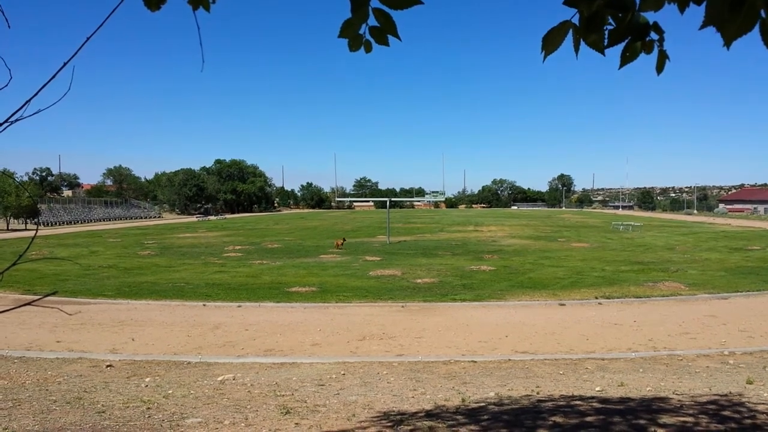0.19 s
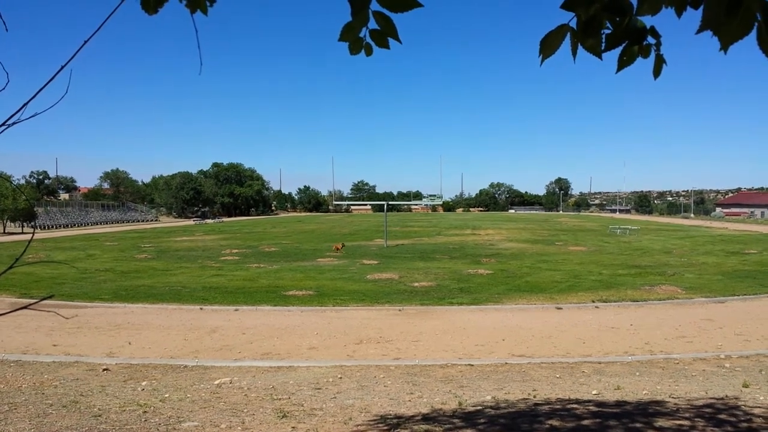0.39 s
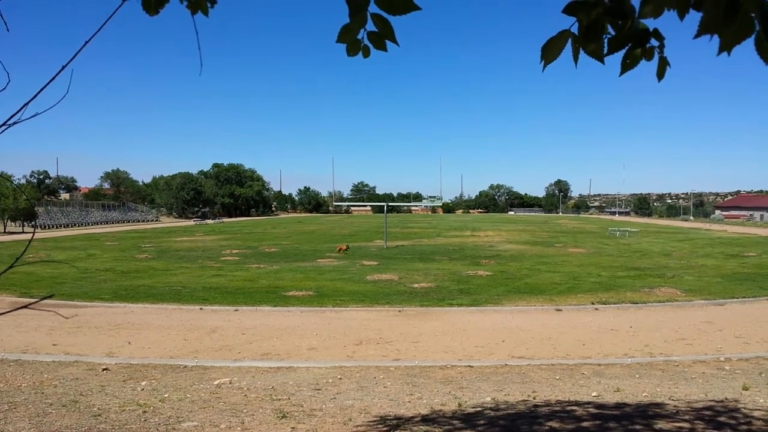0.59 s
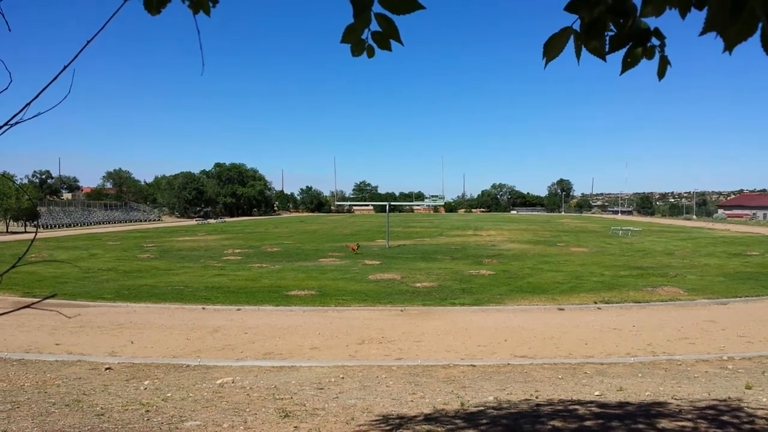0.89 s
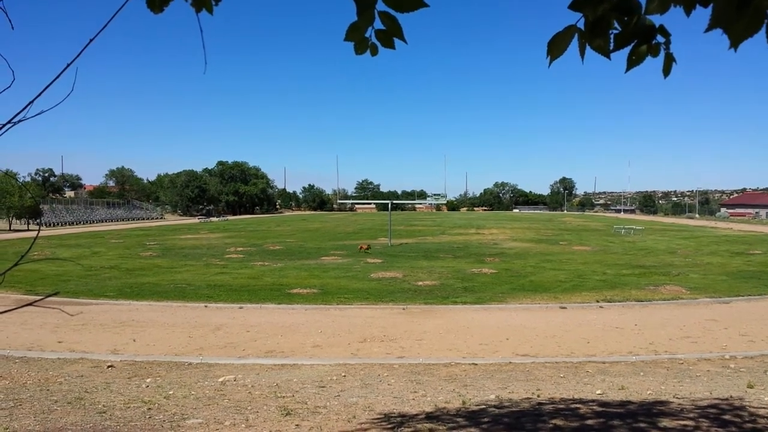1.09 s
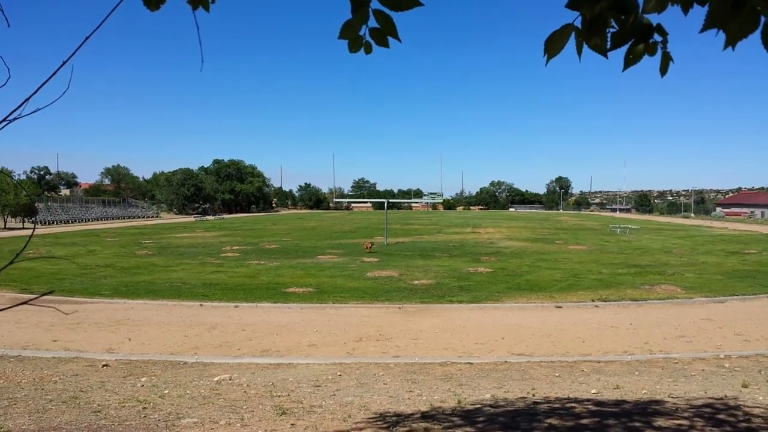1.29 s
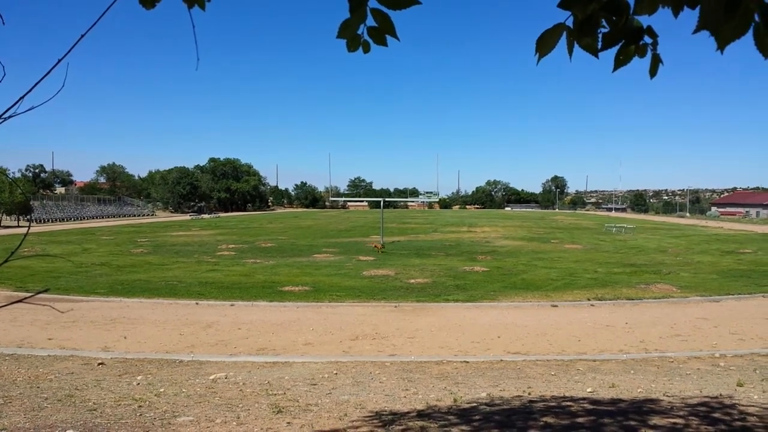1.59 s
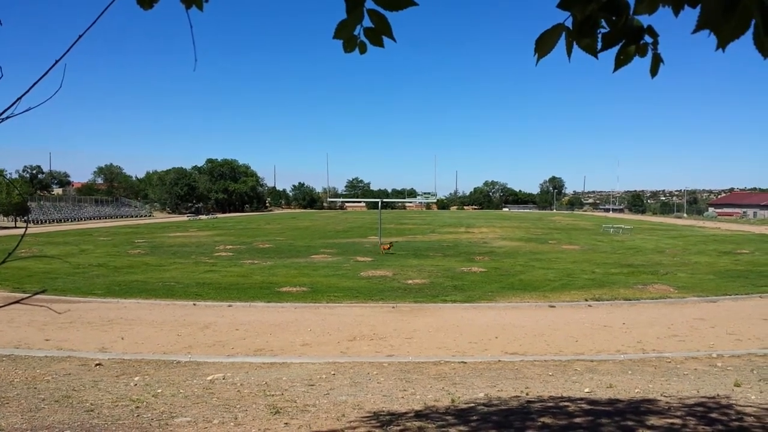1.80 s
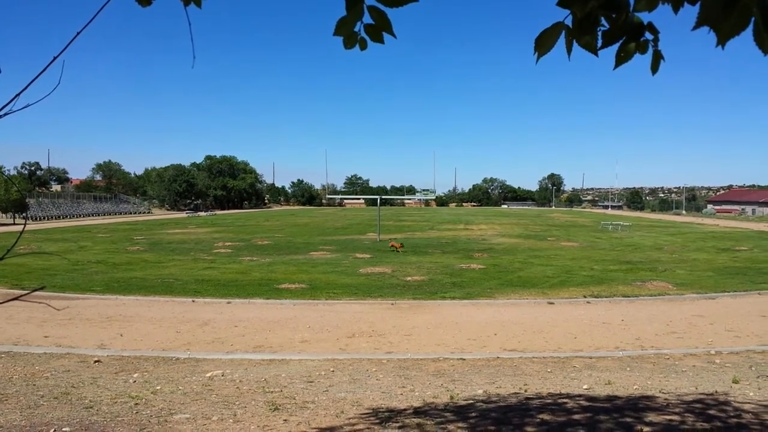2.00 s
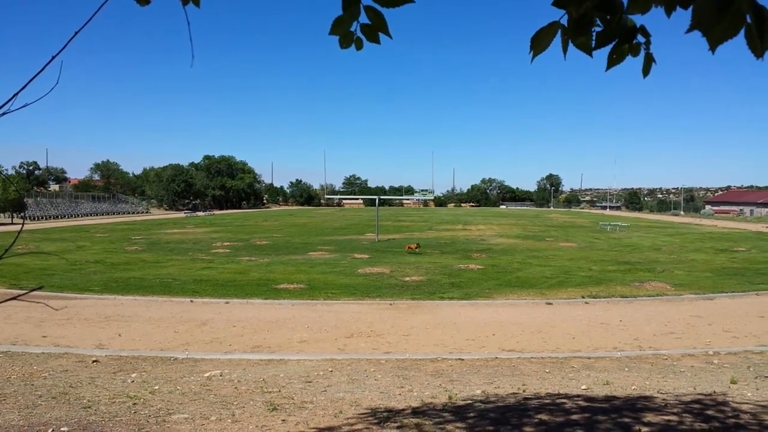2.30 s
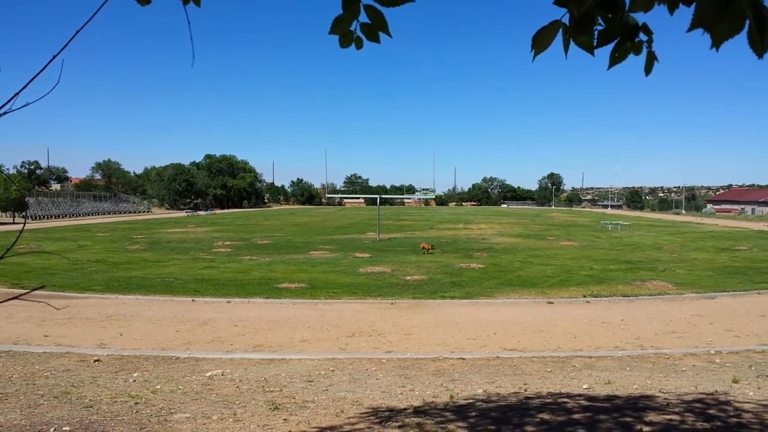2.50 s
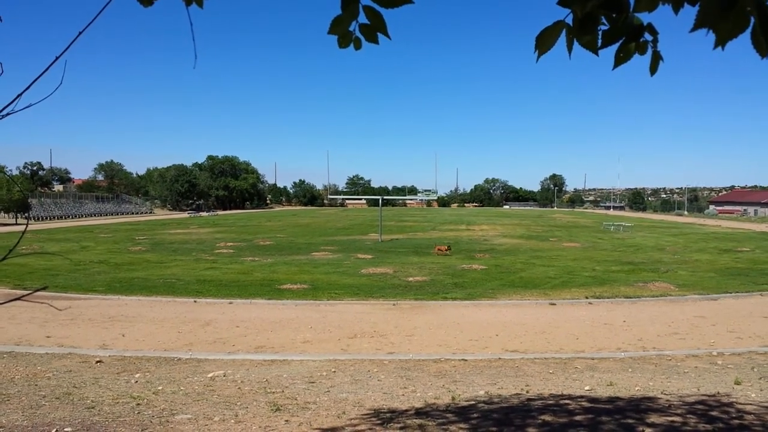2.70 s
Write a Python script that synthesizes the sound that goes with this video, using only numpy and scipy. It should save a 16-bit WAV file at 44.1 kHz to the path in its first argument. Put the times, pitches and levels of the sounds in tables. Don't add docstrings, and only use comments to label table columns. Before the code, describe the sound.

A burrowing animal barks faintly, then once loudly over a swelling distant engine; a hoarse bird caws and another answers. Fingers tick and snap the casing of a handheld microphone on an open field.

```python
import sys
import numpy as np
from scipy import signal
from scipy.io import wavfile
from scipy.ndimage import uniform_filter1d

SR = 44100
rng = np.random.default_rng(int(sys.argv[2]) if len(sys.argv) > 2 else 0)


def to_wav(s):
    ch = np.atleast_2d(s).T
    pcm = np.round(np.clip(ch, -1, 1) * 32767)
    wavfile.write(sys.argv[1], SR, pcm.astype(np.int16))


def magnitude_from_level(level_db):
    exponent = np.asarray(level_db, float) / 20
    return 10 ** exponent


N = 125685
EDGE_HZ = 14600


def evened(x):
    return x / np.sqrt(np.mean(x ** 2) + 1e-20)


def read(points, hz):
    f, value = np.transpose(points)
    return np.interp(np.log(hz + 1), np.log(f + 1), value)


def curve(table, t):
    cols = np.transpose(table)
    return [np.interp(t, cols[0], c) for c in cols[1:]]


def add(mix, start_s, sound, pan_db):
    part = mix[:, round(start_s * SR):][:, :sound.shape[-1]]
    placed = sound * magnitude_from_level(np.array([[min(pan_db, 0)], [min(-pan_db, 0)]]))
    part += placed[:, :part.shape[1]]


def resonate(x, hz, width):
    turn = np.exp(2j * np.pi * np.cumsum(hz * np.ones(len(x))) / SR)
    r = np.exp(-np.pi * width / SR)
    return 2 * (turn * signal.lfilter([1 - r], [1, -r], x / turn + 1e-18)).real


def drift(length, span_s):
    span = max(round(span_s * SR), 1)
    return evened(uniform_filter1d(uniform_filter1d(rng.standard_normal(length), span), span))


def air():
    # start_s [s], level_db [dB]
    gain_ride = [(0, -65.5), (.2, -69), (.48, -73), (.56, -79.5), (1.12, -77), (1.45, -67), (1.8, -63.5),
                 (2.5, -64), (2.65, -65.5), (2.85, -66.5)]
    # freq_hz [Hz], density_db [dB per Hz]
    air_colour = [(40, -8), (110, 0), (400, -17), (1050, -19), (1600, -28.5), (5500, -36.5), (8000, -36.5),
                  (9500, -38.5), (14600, -40.5)]
    # freq_hz [Hz], likeness [-1 to 1]
    port_likeness = [(60, 0.77), (180, 0.9), (550, 0.71), (1650, 0.0), (4970, 0), (15000, 0.13)]
    # freq_hz [Hz], left_minus_right_db [dB]
    port_lean = [(60, -3.5), (240, 4.5), (950, -0.5), (3770, 2), (15000, -5)]
    air_db, patchy_db, flicker_db = 19.5, 2, 0.1
    whine_hz, whine_width_hz, whine_db = 7950, 350, 3.5

    frames, hz = N // 256 + 5, np.fft.rfftfreq(1024, 1 / SR)
    a, b, c, d, patches = rng.standard_normal((frames, 513, 5)).T
    patches = evened(uniform_filter1d(uniform_filter1d(patches, 12, 0), 8, 1))
    flicker = evened(uniform_filter1d(rng.standard_normal(frames), 2))
    same = np.clip(read(port_likeness, hz), -1, 1)[:, None]
    left = a + 1j * b
    right = same * left + np.sqrt(1 - same ** 2) * (c + 1j * d)
    z = np.array([left, right])
    whine = whine_db * np.exp(-((hz[:, None] - whine_hz) / whine_width_hz) ** 2)
    lean = read(port_lean, hz)[:, None] * np.array([.5, -.5])[:, None, None]
    colour_db = read(air_colour, hz)[:, None] + whine + lean
    z *= magnitude_from_level(colour_db + patchy_db * patches + flicker_db * flicker) * (hz < EDGE_HZ)[:, None]
    x = evened(signal.istft(z, nperseg=1024, noverlap=768)[1][:, :N])
    return x * magnitude_from_level(air_db + curve(gain_ride, np.arange(N) / SR)[0])


def engine():
    # start_s [s], fifth_order_hz [Hz], fifth_order_db [dB], bark_db of the other orders [dB]
    engine_ride = [
        (0, 78.5, -68, 7),
        (.56, 78.6, -58, -15),
        (1.15, 80.8, -56.5, -4),
        (1.45, 83.1, -42.5, -4),
        (1.62, 83.8, -41, -3),
        (1.85, 86.5, -38.5, -5.5),
        (2.08, 88.2, -35.5, -6.5),
        (2.3, 89.6, -34.5, -12),
        (2.52, 89.5, -45, -7),
        (2.85, 89.5, -55, -21),
    ]
    # multiple of the cycle rate, level_db [dB]
    engine_orders = [(3, -23), (4, -3.5), (6, -20), (7, -1), (8, -11), (9, -1), (10, -1), (11, -16.5),
                     (12, -2.5), (13, -22.5), (14, -17), (15, -24.5), (16, -17), (17, -17), (18, -14),
                     (20, -18)]
    waver_db, waver_rad = 2.2, .3

    hz, db, bark_db = curve(engine_ride, np.arange(N) / SR)
    cycle = 2 * np.pi * np.cumsum(hz / 5) / SR
    x = np.sqrt(2) * np.cos(5 * cycle)
    for k, level_db in engine_orders:
        level = magnitude_from_level(level_db + bark_db + waver_db * drift(N, .06))
        x = x + level * np.cos(round(k) * cycle + waver_rad * drift(N, .05))
    return magnitude_from_level(db) * x


def chirp(length_s, db, from_hz, to_hz):
    u = np.arange(0, length_s, 1 / SR) / length_s
    hz = from_hz + (to_hz - from_hz) * u
    level = magnitude_from_level(db - 3 + 4 * drift(len(u), .0015)) * np.sqrt(2 * np.sin(np.pi * u))
    return level * np.sin(2 * np.pi * np.cumsum(hz) / SR)


def small_birds(mix):
    # start_s [s], length_s [s], level_db [dB], from_hz [Hz], to_hz [Hz]
    chirp_events = [(.02, .1, -65, 2750, 2250), (.112, .02, -62, 3600, 3100), (.27, .016, -70, 4550, 4500),
                    (.30, .04, -66, 4500, 4500), (.678, .012, -73, 2650, 2550),
                    (.98, .035, -73, 4800, 4200), (.992, .022, -72, 4300, 3650),
                    (1.015, .016, -75, 3900, 4700), (1.025, .035, -74, 4250, 4150),
                    (1.028, .028, -74, 4850, 4800), (1.78, .01, -60, 7300, 7000),
                    (2.49, .01, -65, 7200, 7100), (2.606, .012, -62, 7200, 7200),
                    (2.79, .05, -65, 4600, 4400)]
    for start_s, *row in chirp_events:
        add(mix, start_s, chirp(*row), 0)


def rub(length_s, db, hz):
    u = np.arange(0, length_s, 1 / SR) / length_s
    grit = rng.standard_normal(len(u)) * magnitude_from_level(3.5 * drift(len(u), .001))
    band = signal.butter(3, [.5 * hz, 1.55 * hz], "band", fs=SR, output="sos")
    body = signal.sosfilt(band, grit)
    return magnitude_from_level(db) * evened(body) * np.sin(np.pi * u) ** .35


def finger_rubs(mix):
    # start_s [s], length_s [s], level_db [dB], centre_hz [Hz]
    rub_events = [
        (.138, .02, -43, 900),
        (.15, .048, -46, 1300),
        (.139, .06, -50, 3000),
        (.162, .04, -48, 3900),
        (.34, .21, -62, 2600),
        (2.42, .09, -54, 850),
    ]
    for start_s, *row in rub_events:
        add(mix, start_s, rub(*row), 15)


def tick(db, hz, turns, edge_db):
    u = np.arange(200) / SR * hz
    swell = (u / turns * np.exp(1 - u / turns)) ** 2
    edge = np.sin(2 * np.pi * 1.8 * u) - .35 * np.sin(2 * np.pi * 2.6 * u)
    return magnitude_from_level(db) * swell * (np.sin(2 * np.pi * u) + magnitude_from_level(edge_db) * edge)


def case_ticks(mix):
    # start_s [s], peak_db [dB], pitch_hz [Hz], left_minus_right_db [dB]
    dull_ticks = [(.179, -36.5, 1480, 35), (0.2217, -32, 1020, 32), (0.368, -48.5, 1220, 27),
                  (0.404, -38, 950, 29), (.418, -58, 2500, 20), (0.4746, -42, 3450, 27),
                  (0.479, -40, 2900, 25), (0.59, -55.5, 1000, 22), (.601, -55, 1800, 25),
                  (0.774, -44.5, 873, 28), (.814, -59, 1600, 27), (1.185, -40.5, 1158, 38.5),
                  (1.2824, -40.5, 1430, 27), (1.284, -44.5, 430, 13), (1.33, -55, 1580, 20),
                  (1.454, -41.5, 850, 36), (1.731, -36.5, 625, 26), (1.7511, -30.5, 1560, 43),
                  (1.838, -39, 630, 29), (1.947, -39.5, 450, 33), (2.474, -52, 1570, 20),
                  (2.496, -41, 2160, 35)]
    # start_s [s], peak_db [dB], pitch_hz [Hz], overtone_db [dB], left_minus_right_db [dB]
    bright_ticks = [
        (.2476, -34, 4400, -2, -9),
        (.3128, -36, 5100, -9, 14),
        (1.7503, -14.5, 4400, 3.5, -22),
    ]
    for start_s, db, hz, pan_db in dull_ticks:
        add(mix, start_s + .001, tick(db + 8, hz, turns=.65, edge_db=-12), pan_db)
    for start_s, db, hz, edge_db, pan_db in bright_ticks:
        add(mix, start_s, tick(db, hz, 1.15, edge_db), pan_db)


def snap(db, right_db, modes):
    t, pair = np.arange(600) / SR, np.zeros((2, 600))
    right_slower = np.array([[1], [1.5]])
    port_phase = np.array([[0], [np.pi / 2]])
    for k, (hz, left_mode_db, right_mode_db, swell_ms) in enumerate(modes):
        u = t / (swell_ms / 1000 * right_slower)
        level = magnitude_from_level(np.array([[left_mode_db], [right_mode_db]])) * (-1) ** k
        pair += level * u * np.exp(1 - u) * np.sin(2 * np.pi * hz * t + port_phase)
    return magnitude_from_level(db + np.array([[0], [right_db]])) * pair / abs(pair).max(1, keepdims=True)


def case_snaps(mix):
    # start_s [s], peak_db [dB], right_port_db [dB]
    snap_events = [
        (.2084, .8, -9.5),
        (2.5977, -3, -6),
    ]
    # freq_hz [Hz], left_db [dB], right_db [dB], swell_ms [ms]
    seam_modes = [
        [(186, -14, -41.5, .8), (850, -1, -16.5, 0.67), (1430, -28.5, -15, 0.72), (2230, -0.5, -11.5, 0.44),
         (3250, 2, -8.5, 0.21), (4700, -18.5, -8, .3), (5910, 2, -6, 0.17), (7560, -11, -2.5, 0.13),
         (9700, -7, -2.5, 0.11), (13940, -17, -15, .12)],
        [(607, -2, -19, 0.7), (2050, 2, -17, 0.49), (3120, 3, 0, 0.3), (5580, 0, -6, 0.19),
         (7010, -27, -5.5, 0.18), (8710, -31, -0.5, 0.14), (10460, -32, -5, 0.13), (13200, -32, -14.5, 0.18)],
    ]
    for (start_s, *row), modes in zip(snap_events, seam_modes):
        add(mix, start_s, snap(*row, modes), 0)


def bark(length_s, db, top_hz):
    bark_harmonics = [-34, -10.5, 3, -2, -23, -24.5]
    throat_hz, throat_width_hz, throat_db = 2960, 460, -3.5
    pitch_sag, roughness = .24, .3

    u = np.arange(0, length_s, 1 / SR) / length_s
    arch = np.sin(np.pi * u)
    hz = top_hz * (1 - pitch_sag * (1 - arch)) * (1 + .015 * drift(len(u), .002))
    turns = np.cumsum(hz) / SR
    fuzz = 1 + (roughness + .8 * (1 - arch) + (db < -60)) * drift(len(u), .0008)
    voice = 0
    for k, harmonic_db in enumerate(bark_harmonics, 1):
        off_throat = np.minimum((k * hz - throat_hz) ** 2 / throat_width_hz ** 2, 1)
        voice = voice + magnitude_from_level(harmonic_db + throat_db * off_throat) * np.cos(2 * np.pi * k * turns)
    return magnitude_from_level(db) * evened(voice * fuzz) * arch ** 0.26 * (0.46 + 0.56 * arch ** 3)


def burrowing_animal(mix):
    # start_s [s], length_s [s], level_db [dB], top_pitch_hz [Hz], left_minus_right_db [dB]
    bark_events = [
        (.63, .035, -73, 1050, 0),
        (.995, .1, -71, 850, 0),
        (1.564, .099, -44, 1010, 3),
        (2.64, .045, -62, 900, 0),
    ]
    for start_s, length_s, db, hz, pan_db in bark_events:
        add(mix, start_s, bark(length_s, db, hz), pan_db)


def caw(path, beak, pan_db, echoes):
    throb_per_s, throb_depth, throb_bend = 57, .45, .03
    jitter, shimmer_db = .018, 2
    shut, wide = .78, .95

    t = np.arange(path[0][0], path[-1][0], 1 / SR)
    hz, db, mouth, rough = curve(path, t)
    beat = 2 * np.pi * np.cumsum(throb_per_s * (1 + .18 * drift(len(t), .012))) / SR
    wobble = throb_bend * np.sin(beat) + jitter * (.4 + rough) * drift(len(t), .002)
    turns = np.cumsum(hz * (1 + wobble)) / SR
    folds = 0
    for k in range(1, 11):
        folds = folds + magnitude_from_level(shimmer_db * drift(len(t), 0.0016)) * np.cos(2 * np.pi * k * turns)
    puffs = (0.5 + np.exp(-(turns % 1) / 0.29)) * rng.standard_normal(len(t))
    rough = np.clip(rough, 0, 1)
    drive = ((1 - rough) * evened(folds) + rough * evened(puffs)) * (1 + throb_depth * np.cos(beat))

    bright = np.clip((mouth - shut) / (wide - shut), .1, 1)
    call = 0
    for k, (f, width, beak_db) in enumerate(beak):
        centre, level = (f * mouth, 1) if f < 2250 else (f, bright)
        once = resonate(drive, centre, 1.3 * width)
        call = call + (-1) ** k * magnitude_from_level(beak_db) * level * resonate(once, centre, 1.3 * width)
    call = magnitude_from_level(db) * evened(call) * np.minimum((t[-1] - t) / 0.0069, 1)

    out = np.zeros((2, N))
    add(out, t[0], call, pan_db)
    for delay_s, echo_db, top_hz, echo_pan_db in echoes:
        sparse = rng.standard_normal((2, 900)) * (rng.random((2, 900)) < .02)
        scatter = sparse * np.exp(-np.arange(900) / 300.)
        scatter[:, 0] = 2.5
        scatter = scatter / np.linalg.norm(scatter, axis=1)[:, None]
        dull = signal.lfilter(*signal.butter(1, top_hz, fs=SR), call)
        back = signal.fftconvolve(dull[None], scatter, axes=1)
        add(out, t[0] + delay_s, magnitude_from_level(echo_db) * back, echo_pan_db)
    return out


def answering_bird():
    # start_s [s], pitch_hz [Hz], level_db [dB], mouth opening [0-1.3], roughness [0-1]
    reply_path = [
        (1.91, 439, -55.5, 0.88, 0.34),
        (1.95, 497.7, -49, 0.96, 0.51),
        (2.0, 532.5, -47.5, 0.92, 0.42),
        (2.05, 512, -49.5, 1, 0.32),
        (2.10, 500, -50, 1, 0.1),
        (2.13, 464, -51.5, 0.94, 0.06),
        (2.155, 409, -54, 0.99, 0),
    ]
    # freq_hz [Hz], width_hz [Hz], level_db [dB]
    reply_beak = [(474, 170, -32), (1056, 160, 1.5), (1530, 430, -5), (1950, 330, -6), (2760, 210, -5),
                  (3600, 470, -19)]
    return caw(reply_path, reply_beak, 3, [])


def hoarse_bird():
    # start_s [s], pitch_hz [Hz], level_db [dB], mouth opening [0-1.3], roughness [0-1]
    caw_path = [
        (1.62, 422.4, -51, 0.84, 0.8),
        (1.66, 469.5, -44.5, 1.01, 0.8),
        (1.70, 513, -36.5, 0.96, 0.78),
        (1.76, 542.6, -40, 1.02, 0.41),
        (1.80, 504.7, -39, 1.02, 0.4),
        (1.85, 489.7, -39.5, 1.08, 0.33),
        (1.885, 407, -44, 0.94, 0.3),
        (1.905, 366, -46, 0.8, 0.27),
    ]
    # freq_hz [Hz], width_hz [Hz], level_db [dB]
    caw_beak = [(500, 210, -12.5), (1140, 280, 1), (1620, 270, -7.5), (1890, 210, -11.5),
                (2500, 120, -13.5), (2900, 218, -4), (3730, 250, -15), (4800, 810, -24.5)]
    # delay_s [s], level_db [dB], treble_limit_hz [Hz], left_minus_right_db [dB]
    caw_echoes = [
        (.39, -21, 4500, 0),
    ]
    return caw(caw_path, caw_beak, 8, caw_echoes)


def scene():
    mix = air() + engine() + answering_bird() + hoarse_bird()
    small_birds(mix)
    finger_rubs(mix)
    case_ticks(mix)
    case_snaps(mix)
    burrowing_animal(mix)
    return mix


def top_cut(x):
    return signal.sosfilt(signal.butter(12, 15800, fs=SR, output="sos"), x)


def record(dry):
    bass_cut = signal.butter(2, 60, "high", fs=SR, output="sos")
    x = np.clip(signal.sosfilt(bass_cut, dry), -.97, .97)
    x = signal.oaconvolve(x, signal.firwin(61, EDGE_HZ + 300, fs=SR)[None], "same")
    return top_cut(x)


dry = scene()
out = record(dry)
to_wav(out)
```